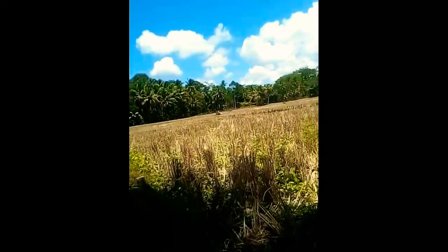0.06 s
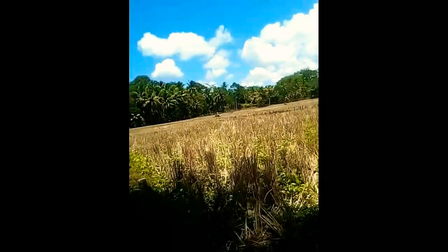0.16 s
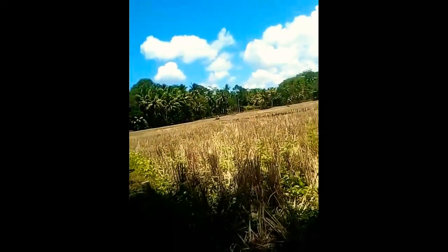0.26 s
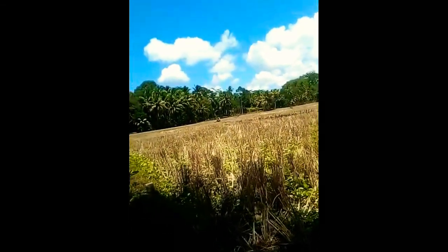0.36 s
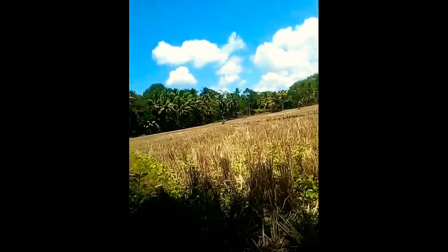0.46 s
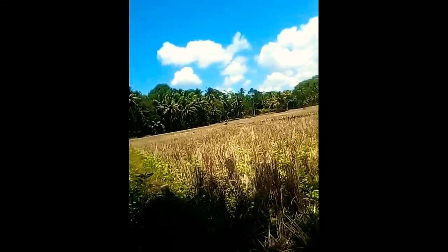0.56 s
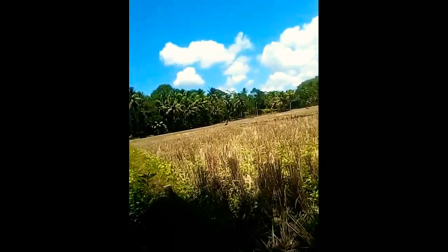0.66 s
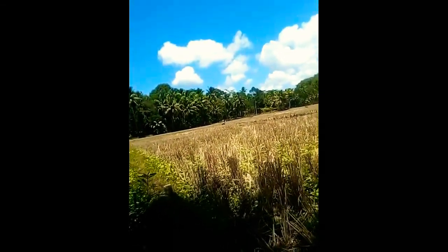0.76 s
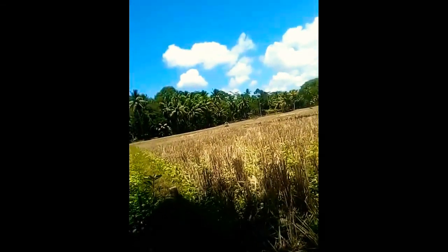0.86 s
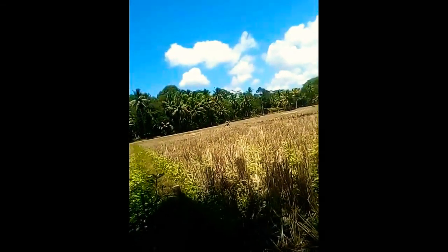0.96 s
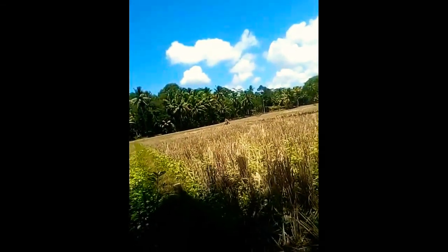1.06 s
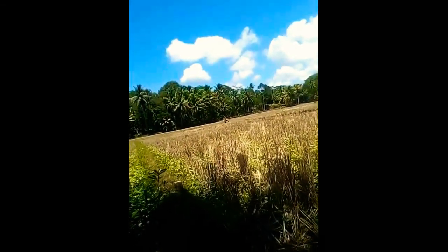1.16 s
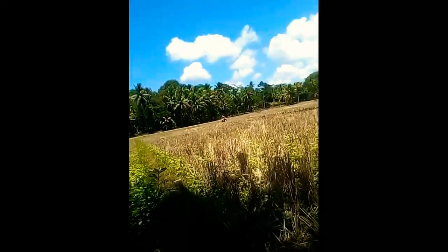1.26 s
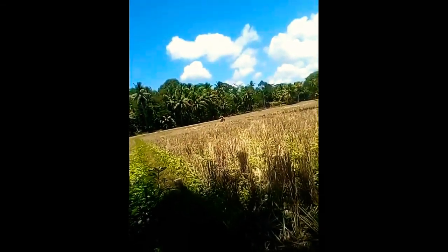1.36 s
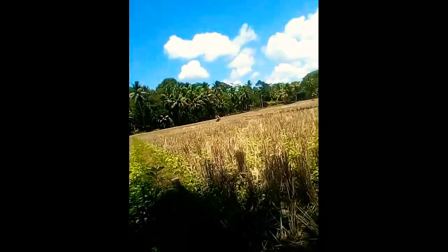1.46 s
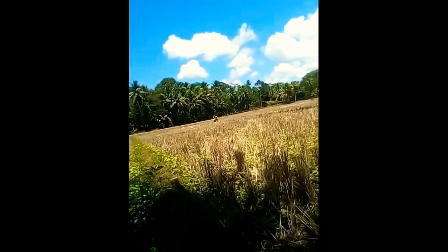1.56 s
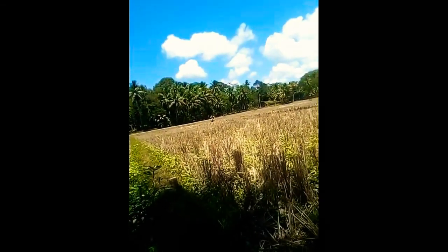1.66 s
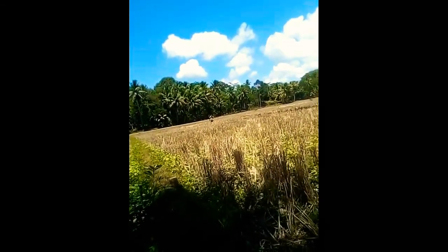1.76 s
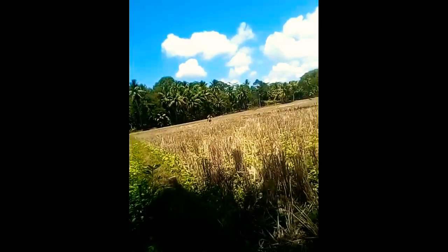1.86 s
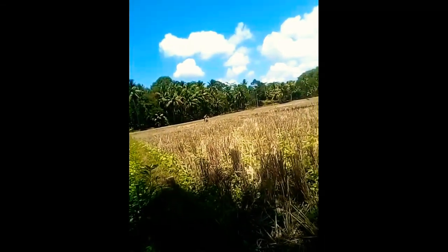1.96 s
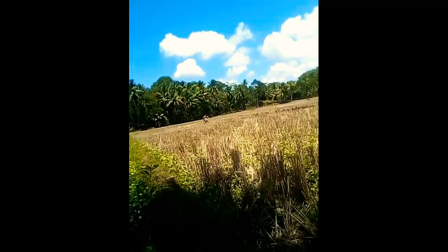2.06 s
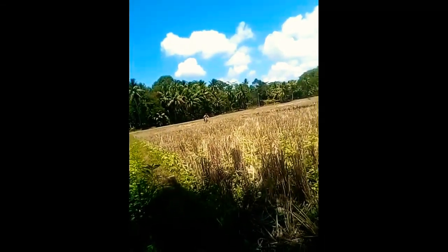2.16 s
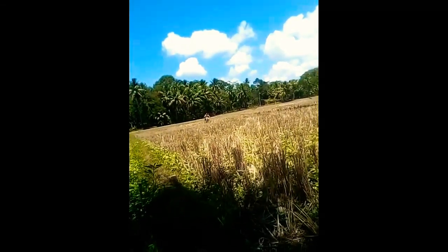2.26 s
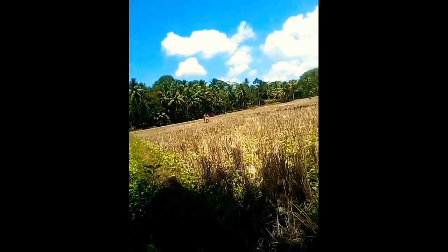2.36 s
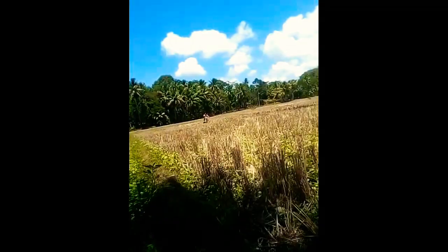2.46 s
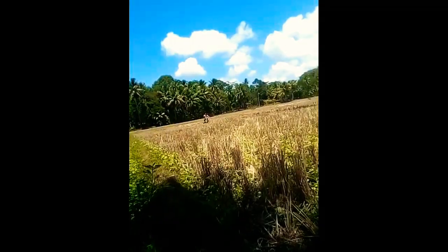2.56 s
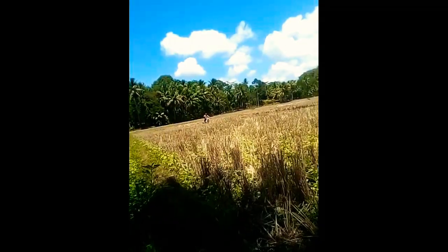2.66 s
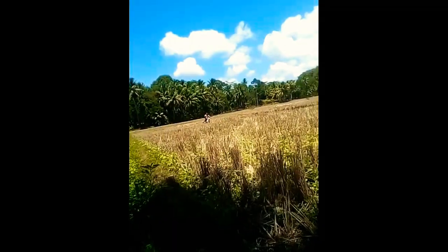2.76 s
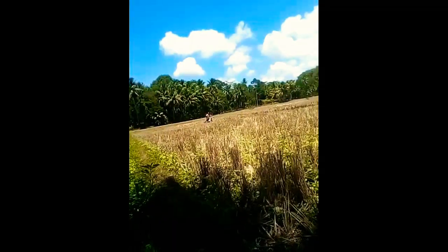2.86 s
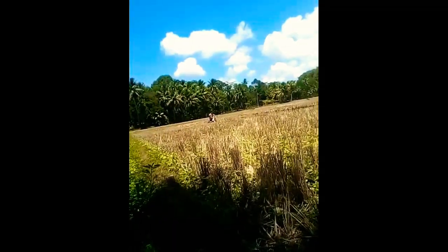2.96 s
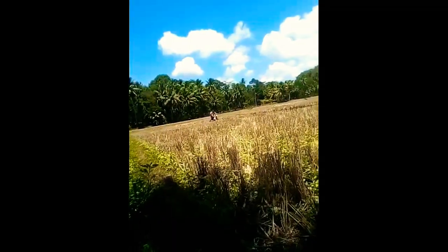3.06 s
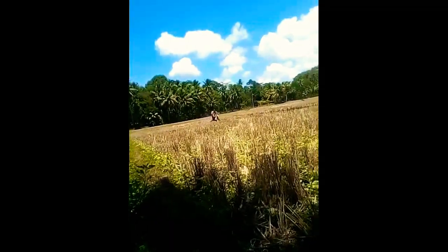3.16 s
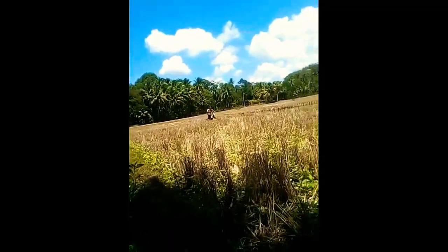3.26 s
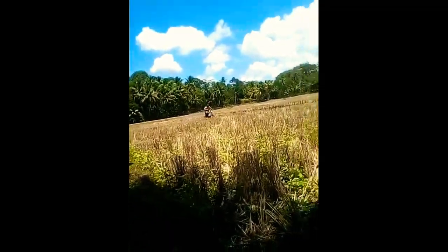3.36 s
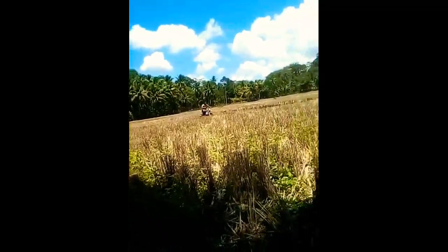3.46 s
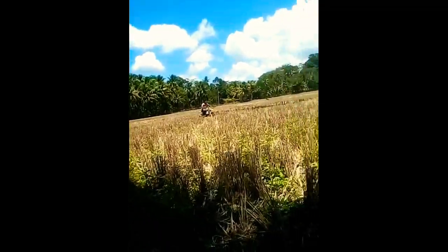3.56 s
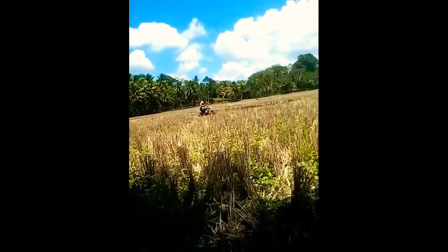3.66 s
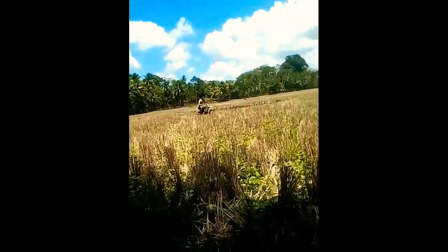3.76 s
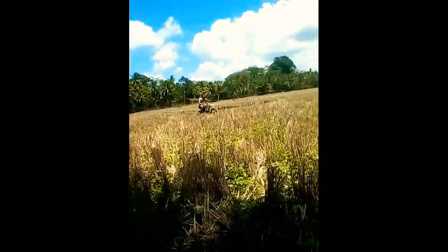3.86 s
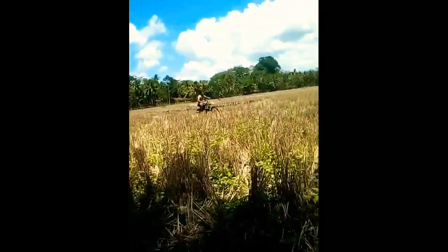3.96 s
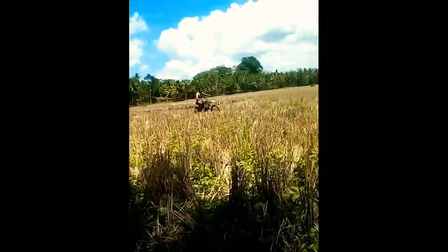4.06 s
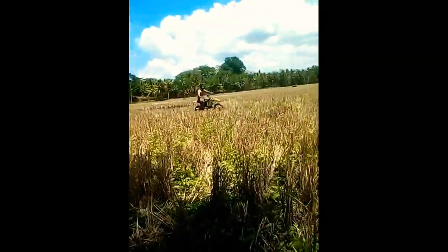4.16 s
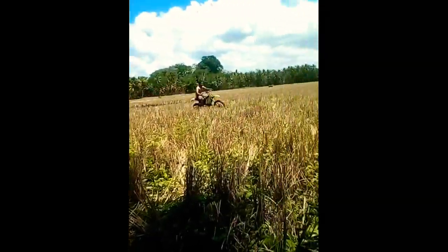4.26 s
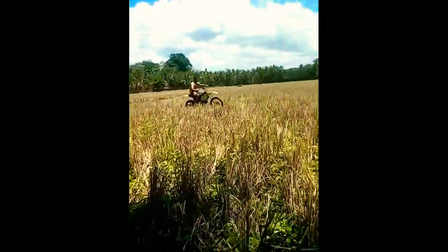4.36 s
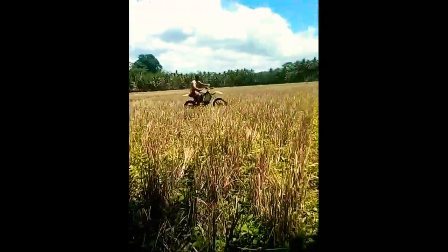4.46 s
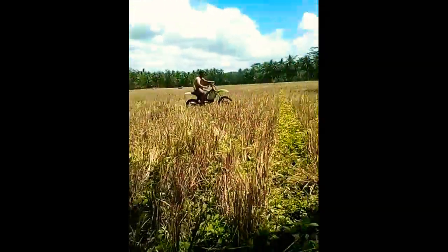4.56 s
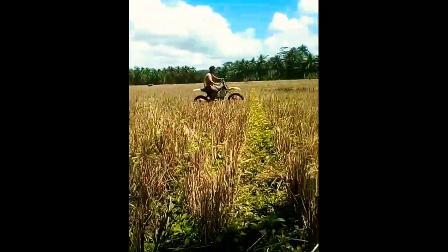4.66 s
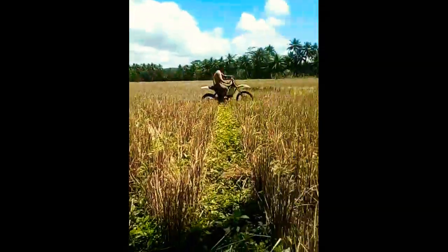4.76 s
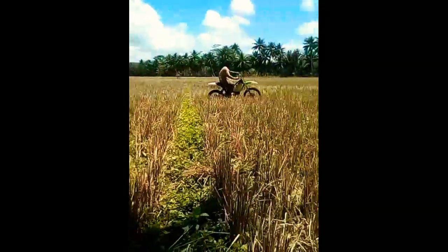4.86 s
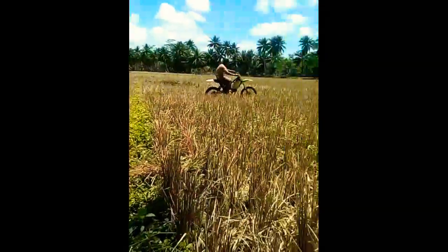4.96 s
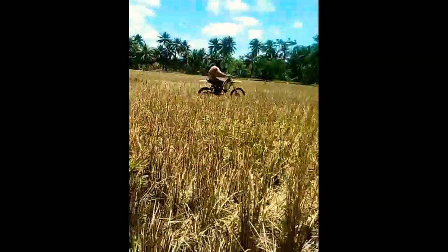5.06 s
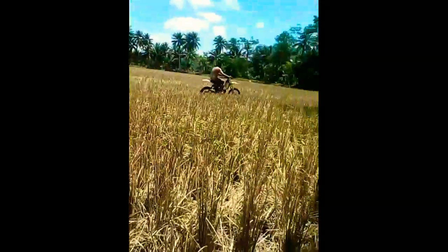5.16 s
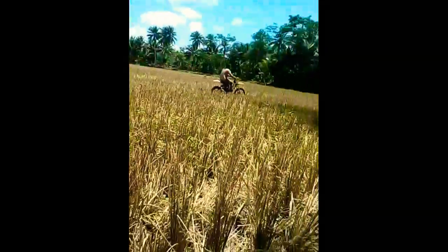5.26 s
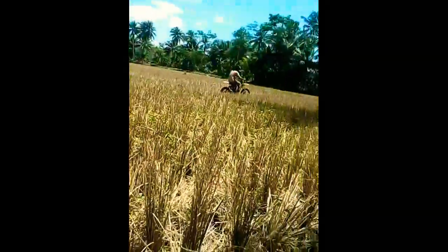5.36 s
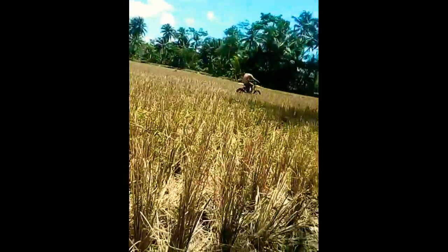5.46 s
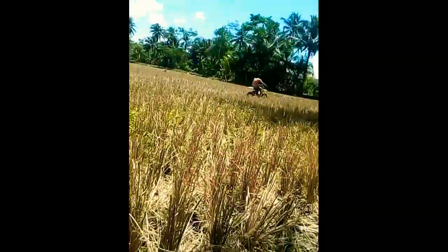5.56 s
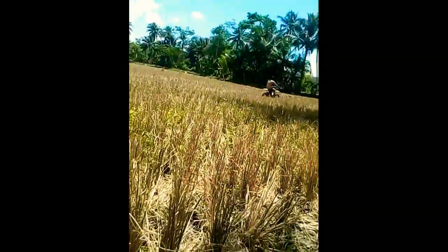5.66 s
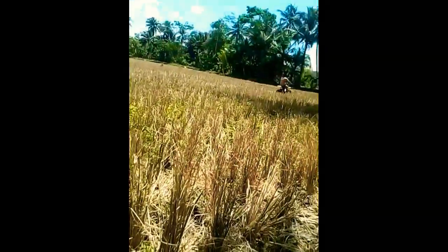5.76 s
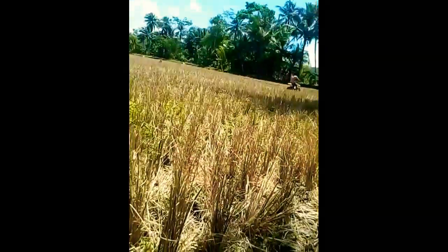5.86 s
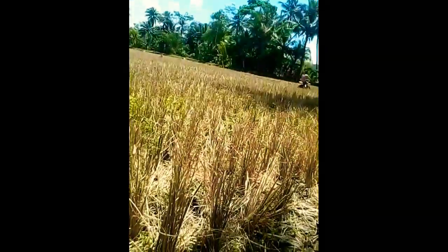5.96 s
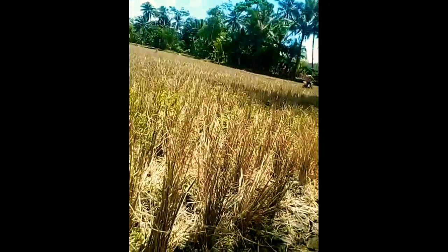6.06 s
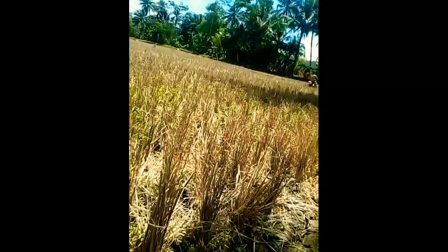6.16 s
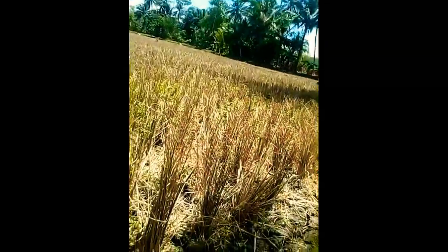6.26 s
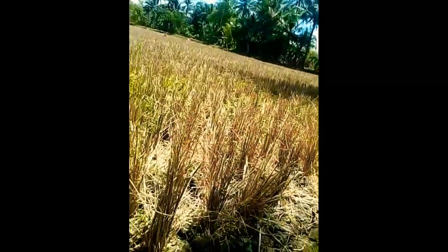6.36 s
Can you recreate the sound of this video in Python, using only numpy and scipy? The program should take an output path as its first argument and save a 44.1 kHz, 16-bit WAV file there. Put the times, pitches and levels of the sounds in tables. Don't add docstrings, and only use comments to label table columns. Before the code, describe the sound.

Outdoors in a stubble field, a low microphone hears light wind rumble and a single-cylinder trail motorcycle approaching with an open exhaust. From 0 to 2 seconds it is a distant, low, fast thumping drone, its crack blurred by the air, pitch wavering over ruts and gradually climbing. Around 2.3 seconds the wheel spins up and the engine stutters on its limiter with a few separate pops, then drops back. From 2.5 to 4.5 seconds it grows louder, clearer and raspier. Near 4.8 seconds, abreast, it surges and stutters again, then sharp, bright cracks pour from the tailpipe with a brief diffuse echo from the trees. At about 5.5 seconds the throttle snaps shut: the cracks vanish, leaving a dull, slowing thump moving off until 6.4 seconds. Wind gusts buffet softly, strongest around 5.1 seconds, and dry straw rustles faintly close by after 6.2 seconds.

```python
import sys
import numpy as np
from scipy import signal
from scipy.io import wavfile
from scipy.ndimage import uniform_filter1d

SR = 44100
rng = np.random.default_rng(int(sys.argv[2]) if len(sys.argv) > 2 else 0)


def store_pcm(level_fs):
    pcm = np.round(np.clip(level_fs, -1, 1) * 32767).astype(np.int16)
    wavfile.write(sys.argv[1], SR, np.atleast_2d(pcm).T)


def gain_from_db(level_db):
    decades = np.asarray(level_db, float) / 20
    return 10 ** decades


N = 282240

# t/s, thump/dB, crack/dB, share smeared by the air on the way (0-1)
PASS = [(0, -23, -35.5, 1), (.4, -23, -38.5, 1), (.55, -21, -38.5, 0.9), (1.2, -21.5, -37, 0.84),
        (1.72, -21, -32.5, 0.56), (2.04, -18, -31.5, 0.91), (2.19, -19, -25.5, 0.53),
        (2.5, -19, -27.5, 0.42), (2.75, -16.5, -25.5, 0.58), (3.3, -19, -24.5, 0.39),
        (3.85, -17.5, -21.5, 0.43), (4.45, -13.5, -22, 0.33), (5.0, -13, -20.5, 0.2),
        (5.49, -17, -21.5, 0.11), (5.515, -12, -25, 0.84), (5.64, -12, -37, 0.74), (6.0, -13, -37.5, 0.84),
        (6.4, -13, -38.5, 0.88)]


def in_time(table):
    s, *columns = np.transpose(table)
    return [np.interp(np.arange(N) / SR, s, c) for c in columns]


def bump(s, length):
    return np.exp(-((np.arange(N) / SR - s) / length) ** 2)


def rms_one(x):
    return x / np.sqrt(np.mean(x ** 2) + 1e-20)


def evened(x, span_s=0.12):
    size = int(span_s * SR)
    power = uniform_filter1d(uniform_filter1d(x ** 2, size), size)
    return x / np.sqrt(power + 1e-12)


def cut(x, hz, kind, order=2):
    return signal.sosfilt(signal.butter(order, hz, kind, fs=SR, output="sos"), x)


def resonate(x, modes, turn, alternate=True, shimmer_db=0):
    shimmer_per_s = 4.0
    out = 0
    for k, (hz, width, front_db, rear_db) in enumerate(modes):
        r = np.exp(-np.pi * width / SR)
        a = [1, -2 * r * np.cos(2 * np.pi * hz / SR), r * r]
        b = [(1 - r * r) / 2, 0, (r * r - 1) / 2]
        waver = 0
        if shimmer_db:
            waver = np.interp(np.arange(N) / SR * shimmer_per_s, np.arange(60), rng.standard_normal(60))
        sign = (-1) ** (k * alternate)
        level = gain_from_db(front_db + rear_db * turn + shimmer_db * waver)
        out = out + sign * level * signal.lfilter(b, a, x)
    return out


def clicks(at, sizes):
    out, whole = np.full(N + 2, 1e-18), np.clip(at.astype(int), 0, N)
    np.add.at(out, whole, sizes * (1 - at % 1))
    np.add.at(out, whole + 1, sizes * (at % 1))
    return out[:N]


def swells(column):
    # t/s, firings per s added, rise/s, fall/s, thump added/dB
    slips = [(0.249, 11, 0.258, .2, -0.5), (0.789, 6, 0.17, 0.13, -3.5), (2.308, 25.5, .18, 0.14, -1.5),
             (2.811, -2.5, 0.13, 0.18, 1), (3.116, -3, .11, .2, 2), (4.345, 4, 0.35, .05, 0),
             (4.617, 1, 0.13, 0.06, 2.5), (4.82, 30, .3, .14, 0.5), (5.148, -3, 0.069, 0.094, 0.5),
             (5.507, -4, 0.0077, 0.008, -8), (6.011, -8, .3, 0.04, -1), (6.165, -3, 0.075, 0.049, 0),
             (6.329, -2, 0.06, 0.019, -1)]
    t = np.arange(N) / SR
    total = 0
    for row in slips:
        s, rise, fall = row[0], row[2], row[3]
        away = np.where(t < s, (s - t) / rise, (t - s) / fall)
        total = total + row[column] * np.cos(np.pi / 2 * np.clip(away, 0, 1)) ** 2
    return total


def hops():
    # t/s, firings per s added
    ruts = [(0.255, 3.3), (0.368, 1.2), (0.48, 3.4), (0.568, 1.3), (0.739, 4), (0.817, 3), (1.07, 1.3),
            (1.187, 2.4), (1.264, 1.3), (1.371, 2.4), (1.481, 4), (1.572, 0.99), (1.676, 4), (1.747, 1.4),
            (1.82, 2.8), (1.875, 3), (1.964, 3.4), (2.078, 2.3), (2.565, 3.3), (2.728, 3.2), (2.788, 0.8),
            (2.884, 4.4), (2.957, 2.6), (3.024, 4), (3.209, 3.6), (3.304, 2.8), (3.408, 1.8), (3.496, 3.1),
            (3.644, 1.3), (3.796, 4), (4.028, 2.2), (4.155, 2.6), (4.241, 1.9), (4.346, 4), (4.484, 0.9),
            (4.598, 0.98), (5.1, 3.9), (5.211, 2.9), (5.32, 2.6)]
    hop_s = 0.021
    t = np.arange(N) / SR
    coarse = t[::20]
    surge = sum(added * np.exp(-((coarse - s) / hop_s) ** 2) for s, added in ruts)
    mean = uniform_filter1d(uniform_filter1d(surge, size=300), size=300)
    return np.interp(t, coarse, surge - mean)


def cycles(rate):
    # t/s, peak level/dB
    sparks = [
        [(2.2558, -26), (2.2977, -7), (2.3181, -5), (2.3391, 11), (2.3815, -2)],
        [(4.7706, -1), (4.7915, -4), (4.8125, -9), (4.8334, -6), (4.8783, -7)],
        [(5.495, -18), (5.5165, 5)],
    ]
    marks = [.0767, .1892, .2944, .4072, .5253, .647, .7651, .8795, 1.0036, 1.1292, 1.2525, 1.3742, 1.4905,
             1.6047, 1.714, 1.8203, 1.9229, 2.0232, 2.1329, 2.4585, 2.5762, 2.6954, 2.8163, 2.9393, 3.0586,
             3.1857, 3.3076, 3.4255, 3.5432, 3.6604, 3.7753, 3.8894, 4.0019, 4.1127, 4.2211, 4.3265, 4.433,
             4.5412, 4.6444, 4.7381, 4.9174, 5.036, 5.1634, 5.2935, 5.428, 5.6332, 5.7603, 5.8711, 5.9678,
             6.018, 6.1274, 6.2343, 6.3434]
    rev_limit = 96.5
    mark_lag_s, lone_miss_s = .0008, 2.431
    turns = np.cumsum(np.minimum(rate, rev_limit)) / SR
    heard = np.vstack(sparks)[:, 0]
    known = np.sort(np.append(heard, np.add(marks, mark_lag_s)))
    counted = np.interp(known * SR, np.arange(N), turns)
    whole = np.cumsum(np.round(np.diff(counted, prepend=0)))
    turns += np.interp(np.arange(N), known * SR, whole - counted)
    count = np.arange(np.ceil(turns[0]), turns[-1])
    fired = whole[np.isin(known, heard)]
    at = np.interp(count, turns, np.arange(N))
    cutting = sum((count > fired[first]) & (count < fired[first + 4]) for first in (0, 5))
    sparked = (cutting == 0) | np.isin(count, fired)
    sparked &= np.abs(at / SR - lone_miss_s) > .005
    after_miss = sparked & ~np.roll(sparked, 1)
    return at, sparked, after_miss


def tailpipe_turn():
    abreast_s, swing_s, far_turn = 4.79, 0.29, 0.14
    swung = .5 + .5 * np.tanh((np.arange(N) / SR - abreast_s) / swing_s)
    return far_turn + (1 - far_turn) * swung


def flutter():
    # t/s, length/s, level/dB
    pockets = [(.03, 0.078, 1.5), (.28, 0.075, -4), (.48, 0.021, -2), (.65, 0.058, 1), (.97, 0.047, -3),
               (1.09, 0.04, 1.5), (1.21, 0.054, -1.5), (1.293, 0.034, 2), (1.498, .03, -1),
               (1.673, 0.016, -3), (1.87, 0.037, -1.5), (1.965, 0.02, -3), (2.04, 0.024, 0.5),
               (4.2, 0.024, -2), (4.33, 0.06, 1), (4.45, 0.046, -0.5), (5.948, 0.06, -1), (6.2, 0.087, 0)]
    return sum(db * bump(s, length) for s, length, db in pockets)


def thump(at, sparked, chance):
    # f/Hz, width/Hz, level from the front/dB, added from the rear/dB
    pipe_modes = [(163.4, 49.6, 6, -6), (190, 119, -8, 13.5), (138.3, 25.3, 4, 12), (255, 21, -24, 16.5)]
    # f/Hz, width/Hz, level from the front/dB, added from the rear/dB
    body_modes = [(69, 70, -10, -7), (335, 60, -21, -11)]
    # t/s, share (0-1)
    intake_share = [(0, .85), (1.2, .8), (2.2, .85), (2.5, .62), (3.9, .62), (4.5, .7), (4.9, 0.3),
                    (5.25, 0.03), (6.4, 0.02)]
    unsparked_db = -6
    lag_s, front_lead_s = -.0054, -.0011
    rut_db = 0.04
    suction, turn = in_time(intake_share)[0], tailpipe_turn()
    here = at.astype(int)
    push = np.where(sparked, 1, gain_from_db(unsparked_db)) * gain_from_db(.45 * chance[:, 1])
    start = at + 3.5 * chance[:, 0] + (lag_s - front_lead_s * (1 - turn[here])) * SR
    intake = clicks(start + np.gradient(at) / 4, push * suction[here])
    flow = clicks(start, push) - intake
    pipe = cut(resonate(flow, pipe_modes, turn), 100.2, "high")
    pipe = cut(pipe, 280, "low", order=4) - resonate(flow, body_modes, turn)
    level_db = in_time(PASS)[0] + swells(column=4) + flutter() + rut_db * hops()
    return gain_from_db(level_db) * evened(cut(pipe, 480, "low"), span_s=.045)


def focus(column):
    # t/s, length/s, bark/dB, rasp/dB, sizzle/dB
    lenses = [(.2, 0.22, -2, -1.5, 2.5), (0.897, 0.45, 2, 4, 0.5), (1.407, 0.19, 3, 1, -2),
              (1.706, 0.086, 1.5, 1, -2), (1.975, 0.16, 0.5, 0, 2.5), (2.9, 0.3, -1, 1, -4.5),
              (3.2, 0.22, -1, -1, -2), (3.418, 0.21, -0.5, 1.5, -7), (3.758, 0.23, -0.5, -2, -0.5),
              (4.403, 0.43, 3, -1, -2.5), (4.98, 0.083, 1.5, 0.5, -2.5), (5.305, 0.24, 3.5, -3, 1.5),
              (5.837, 0.28, -1.5, 0.5, 6.5), (6.25, 0.35, -2.5, 2, -2)]
    return sum(row[column] * bump(row[0], row[1]) for row in lenses)


def scatter(shock, places=12):
    along = np.linspace(0, places - 1, N)
    patterns = rng.standard_normal((places, 600)) * np.exp(-np.arange(600) / 60.0)
    out = 0
    for k, pattern in enumerate(patterns):
        near = np.cos(np.pi / 2 * np.clip(along - k, -1, 1))
        out = out + signal.oaconvolve(shock * near, pattern)[:N]
    return out


def crack_band(scattered, jet, smeared, turn, modes, roar_share, edges):
    shimmer_db = 1.5
    sharp = evened(resonate(scattered + jet, modes, turn, alternate=False, shimmer_db=shimmer_db))
    roar = evened(resonate(rng.standard_normal(N), modes, turn, shimmer_db=shimmer_db), span_s=0.31)
    roar = cut(roar, edges, "band", order=1)
    share = np.clip(smeared ** 3 * roar_share, 0, 1)
    return cut(np.sqrt(1 - share) * sharp + np.sqrt(share) * roar, edges, "band", order=1)


def trees(x):
    level_db, t60_s, lag_s = -7.5, 0.54, 0.013
    t = np.arange(SR // 2) / SR
    tail = rng.standard_normal(len(t)) * gain_from_db(-60 * t / t60_s) * (t > lag_s)
    return gain_from_db(level_db) * signal.oaconvolve(cut(x, 670, "high", order=1), tail / np.linalg.norm(tail))[:N]


def hollowed(x):
    # f/Hz, width/Hz, depth (0-1)
    hollows = [(421, 29, 0.7), (1020, 61, 0.57), (1634, 59, 0), (2564, 29, 0), (3410, 350, 0.31),
               (4480, 570, 0.5), (5650, 73, 0.02)]
    for hz, width, depth in hollows:
        x = x - depth * cut(x, (hz - width / 2, hz + width / 2), "band", order=1)
    return x


def crack(at, sparked, after_miss, chance):
    # f/Hz, width/Hz, level from the front/dB, added from the rear/dB
    bark_modes = [(493.5, 72, 2.5, 7), (640, 95, -3.5, 4.5), (801, 166, 0, -1), (1084, 200, 4.5, -0.5),
                  (1280, 550, 2.5, -11.5), (267, 220, -19, 21)]
    rasp_modes = [(1893, 210, -4, -2), (2074, 880, 3.5, 2.5), (2172, 237, 1.5, -5.5), (2666, 180, -7, 8.5),
                  (3020, 160, -8, 9)]
    sizzle_modes = [(3730, 1110, 0, 4), (5550, 570, -4, -3), (6400, 370, 4.5, -6), (7360, 980, -51.5, 1)]
    spit_modes = [(7550, 170, -6.5, 17), (9700, 3700, -15.5, 7.2), (14800, 1900, -29, 10)]
    throttle_shut_s = 5.505
    haze_turn, coasting_turn = 0.45, 0.11
    ground_lag_s, ground_db, edge_hz = 0.001415, -11, 2540
    front_db, ring_db = -40, -0.5

    bark_db, smeared = in_time(PASS)[1:]
    rear, coasting = tailpipe_turn(), np.arange(N) > throttle_shut_s * SR
    rasp_db = bark_db + 11 - 15 * smeared - 8 * rear + focus(column=3)
    sizzle_db = bark_db - 8 - 6.5 * smeared - 0.5 * rear + focus(column=4)
    turn = np.where(coasting, coasting_turn, rear) + haze_turn * smeared

    spread_db = np.where(at > throttle_shut_s * SR, 1.2, .8)
    size = np.where(sparked, 1, gain_from_db(-11)) * gain_from_db(spread_db * chance[:, 2] + .3 * after_miss)
    wobble = 16 * smeared[at.astype(int)] ** 2 * chance[:, 3]
    shock = clicks(at + wobble, -size)
    bounce = clicks(at + wobble + ground_lag_s * SR, -size)
    grounded = cut(shock + gain_from_db(ground_db) * bounce, edge_hz, "low")
    front = np.where(np.arange(N) < throttle_shut_s * SR, 1, .08)
    scattered = front * (grounded + gain_from_db(-22.5) * scatter(shock))
    puff = signal.lfilter([1], [1, -np.exp(-1000 / (2.6 * SR))], -shock)

    bare = evened(cut(cut(grounded, 200, "high", order=1), 2000, "low", order=4))
    out = gain_from_db(bark_db + front_db) * (1 - smeared) * front * bare
    # modes, level/dB, jet noise/dB, roar share, band edges/Hz
    layers = ((bark_modes, bark_db + ring_db + focus(column=2), -46, .75, (230, 1750)),
              (rasp_modes, rasp_db, -39, 1.4, (1500, 2800)),
              (sizzle_modes, sizzle_db, -21, 12, (3200, 7600)))
    for modes, level_db, jet_db, roar_share, edges in layers:
        jet = gain_from_db(jet_db) * puff * rng.standard_normal(N)
        out = out + gain_from_db(level_db) * crack_band(scattered, jet, smeared, turn, modes, roar_share, edges)
    spit = resonate(evened((puff + 0.062) * rng.standard_normal(N)), spit_modes, turn)
    body = cut(hollowed(out + trees(out)), 6130, "low", order=4)
    return body + gain_from_db(sizzle_db - 20.5) * cut(spit, 6300, "high", order=4)


def glinting(x):
    # t/s, length/s, f/Hz, level/dB
    glints = [(.25, 0.18, 2840, 4), (0.8, 0.41, 708, 5.5), (1.547, 0.26, 2210, 5), (1.55, 0.14, 3020, -9),
              (2.3, 0.17, 4700, 8), (3.1, 0.3, 1300, 8), (3.196, 0.38, 2770, -4.5), (2.4, 0.091, 1400, 4.5),
              (3.9, 0.14, 700, 4), (3.555, 0.39, 320, 7), (4.051, 0.45, 440, -9), (4.9, 0.16, 2000, 5.5),
              (3.6, 0.38, 3600, 2), (5.17, 0.37, 3200, 6.5), (5.4, 0.18, 600, -3.5), (3, 0.49, 390, -5),
              (2.3, 0.16, 500, 4.5), (0.68, 0.82, 430, 1.5), (4.9, .05, 500, -2.5), (4, 0.32, 560, 2.5),
              (4.76, 0.58, 1150, 4.5), (4.5, 0.63, 4000, 8), (4.75, 0.21, 950, -9.5),
              (4.93, 0.23, 1630, -12), (5.304, 0.2, 364, -26.5), (6.1, 0.31, 930, -9.5),
              (3.3, 0.23, 4300, 6.5), (6.3, 0.18, 474, 10), (6.148, 0.56, 1070, 8.5), (3.81, .35, 205, 4.5),
              (3.7, 0.56, 1600, 5.5), (3.9, 0.33, 1010, -13), (4.63, 0.39, 2200, 3),
              (4.7, 0.63, 1910, -8.5), (5.9, 0.16, 260, 8.5), (4.45, 0.21, 260, 7.5),
              (6.0, 0.54, 280, -6.5), (5.3, .35, 500, -5.5), (4.2, 0.9, 340, -5.5), (.9, 1, 85, 7),
              (4.2, 0.31, 8000, 4.5), (5.2, .25, 790, 1), (2.1, 0.39, 200, -14.5), (5.1, 0.26, 2300, 1)]
    # t/s, length/s, f/Hz, level/dB
    more_glints = [(1.4, 0.99, 330, -4.5), (1.95, 0.35, 236, -8), (1, 0.83, 208, -5), (2.7, .25, 200, -5),
                   (6.3, .12, 460, -9), (5.72, 0.19, 430, 12), (3.3, 0.33, 760, 6.5), (3.9, 0.22, 710, -7.5),
                   (3.45, 0.56, 340, -6.5), (5.2, .2, 295, 5.5), (5.6, .1, 278, 8.5), (4.48, 0.22, 800, -1)]
    half_width = 0.15 / 2
    out = x.copy()
    for s, length, hz, db in [*glints, *more_glints]:
        first, last = max(int((s - 2 * length) * SR), 0), min(int((s + 2 * length) * SR), N)
        near = np.arange(first, last)
        band = cut(x[near], (hz * (1 - half_width), hz * (1 + half_width)), "band", order=1)
        out[near] += (gain_from_db(db * np.exp(-((near / SR - s) / length) ** 2)) - 1) * band
    return out


def wind():
    # t/s, peak level/dB, length/s
    gusts = [(0, -32, 0.056), (0.677, -50, 0.17), (1.103, -42, 0.067), (1.346, -41, 0.14),
             (2.041, -48, 0.27), (2.591, -42.5, 0.28), (3.097, -37, 0.29), (3.803, -41.5, 0.3),
             (4.41, -50, 0.25), (4.724, -32, 0.082), (4.906, -47, 0.072), (5.105, -27.5, 0.052),
             (5.322, -29, 0.11), (5.485, -36, 0.045), (5.967, -33, 0.11), (6.125, -39, 0.055),
             (6.335, -34, 0.023)]
    calm_db = -53
    rumble = cut(cut(rng.standard_normal(N), 29, "low", order=5), 5.5, "high")
    blowing = gain_from_db(calm_db) + sum(gain_from_db(db) * bump(s, length) for s, db, length in gusts)
    return blowing * evened(rumble, span_s=.12)


def straw():
    # t/s, length/s, level/dB
    rustles = [
        (6.233, 0.035, -41),
        (6.364, 0.041, -46.5),
    ]
    grains = rng.standard_normal(N) * gain_from_db(3.9 * rng.exponential(1, N))
    shape = sum(gain_from_db(db) * bump(s, length) for s, length, db in rustles)
    return shape * rms_one(cut(cut(grains, 5800, "low", order=8), 880, "high"))


def scene():
    # t/s, firings per s
    road_speed = [(0, 65.6), (.5, 67), (0.92, 64.5), (1.0, 63), (1.35, 66), (1.61, 71), (1.71, 74.5),
                  (1.9, 78), (2.13, 82.5), (2.47, 67.3), (3.32, 68.2), (3.89, 70.3), (4.5, 75.5),
                  (4.98, 62.9), (5.22, 62.6), (5.34, 59.8), (5.5, 59.6), (5.53, 56.8), (5.67, 49.6),
                  (6.4, 45.3)]
    hiss_db = -84
    at, sparked, after_miss = cycles(in_time(road_speed)[0] + swells(column=1) + hops())
    chance = rng.standard_normal((600, 4))[:len(at)]
    engine = glinting(thump(at, sparked, chance) + crack(at, sparked, after_miss, chance))
    return (engine + wind() + straw() + gain_from_db(hiss_db) * rng.standard_normal(N))[None]


def band_limit(x):
    return signal.sosfilt(signal.butter(12, 15760, fs=SR, output="sos"), x)


def record(dry):
    return band_limit(1.6 * np.tanh(dry / 1.6))


dry = scene()
out = record(dry)
store_pcm(out)
```